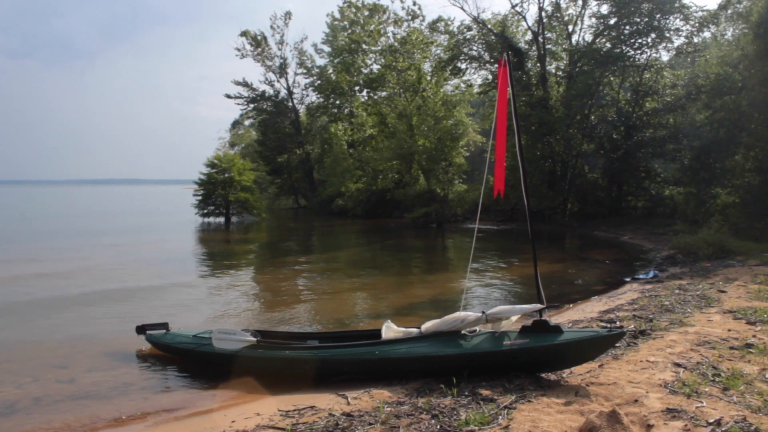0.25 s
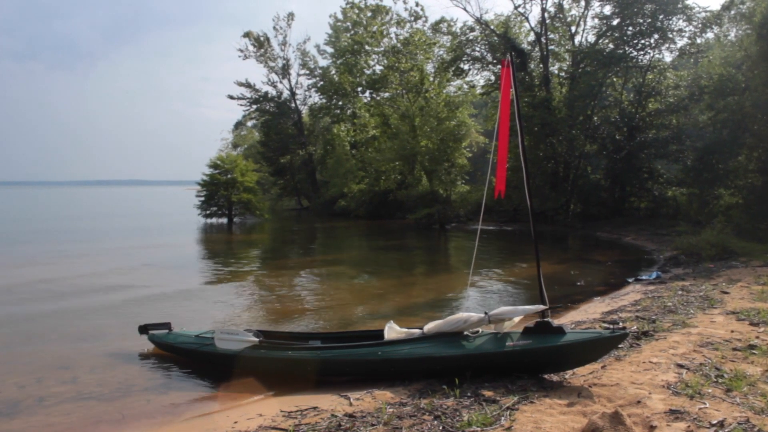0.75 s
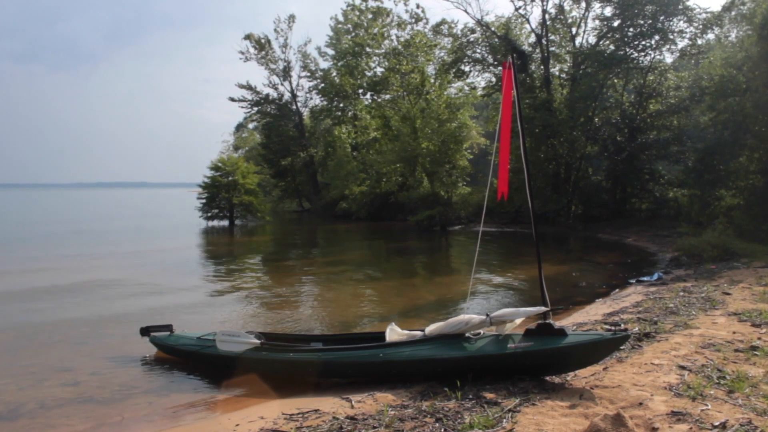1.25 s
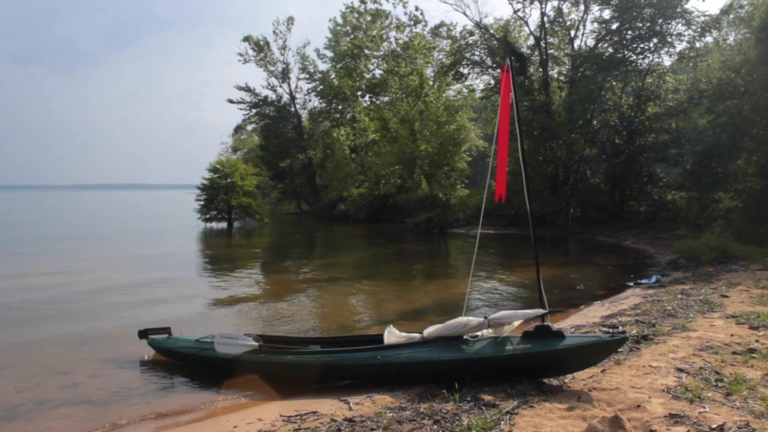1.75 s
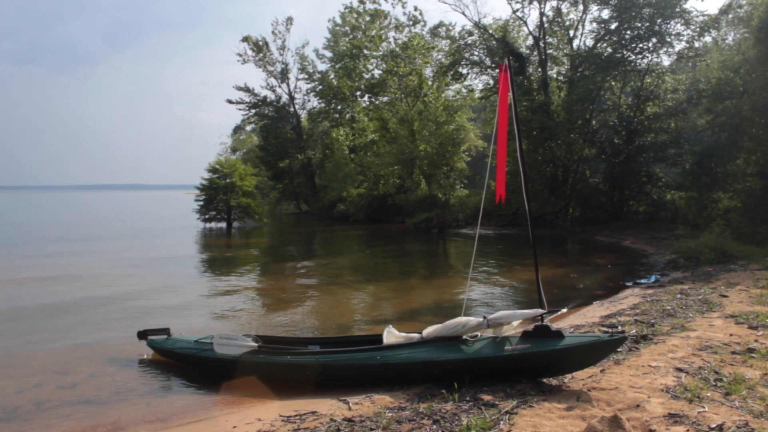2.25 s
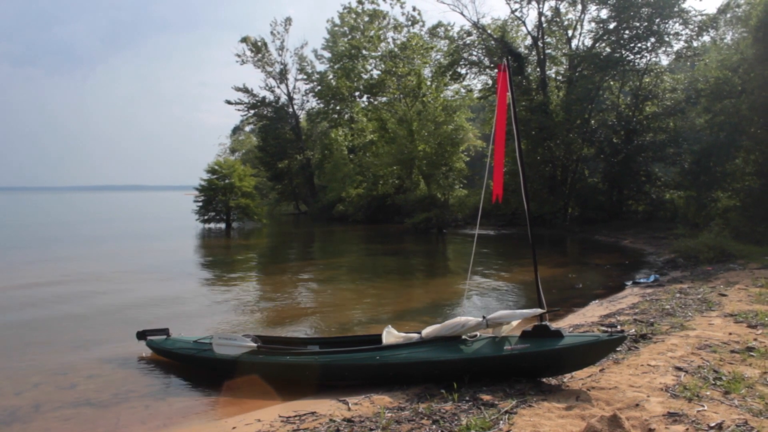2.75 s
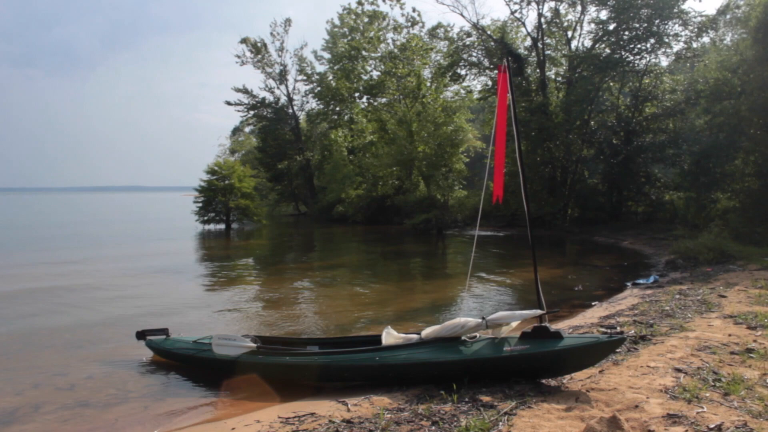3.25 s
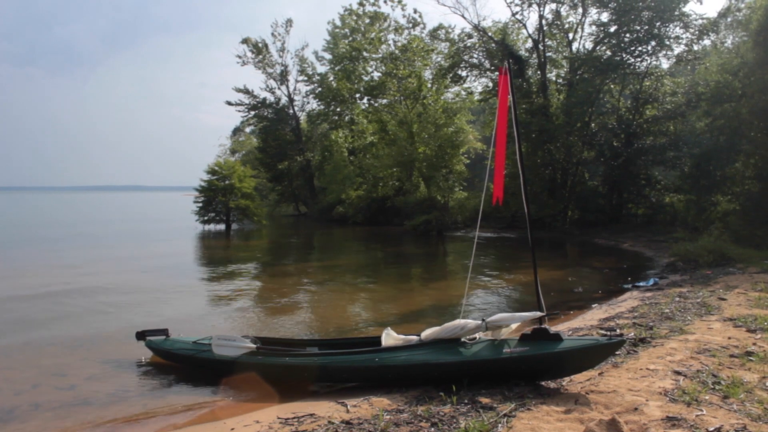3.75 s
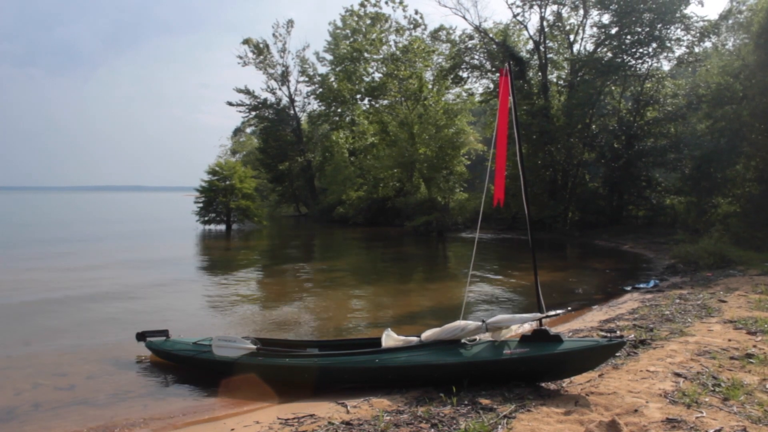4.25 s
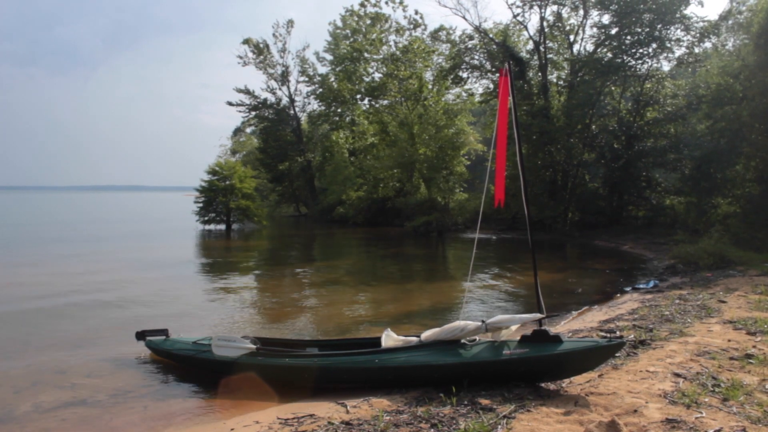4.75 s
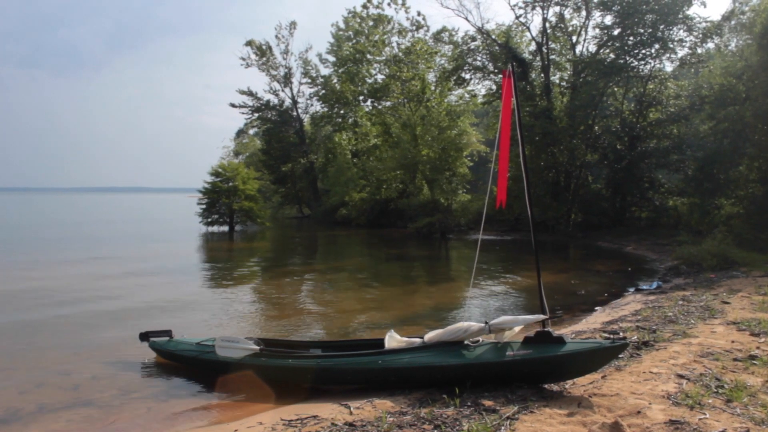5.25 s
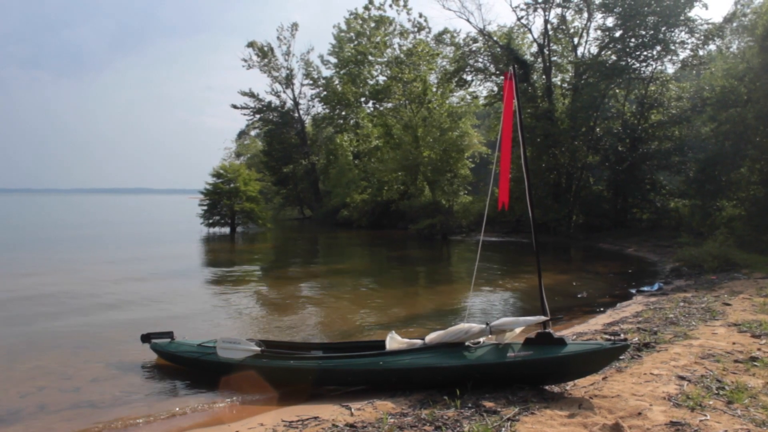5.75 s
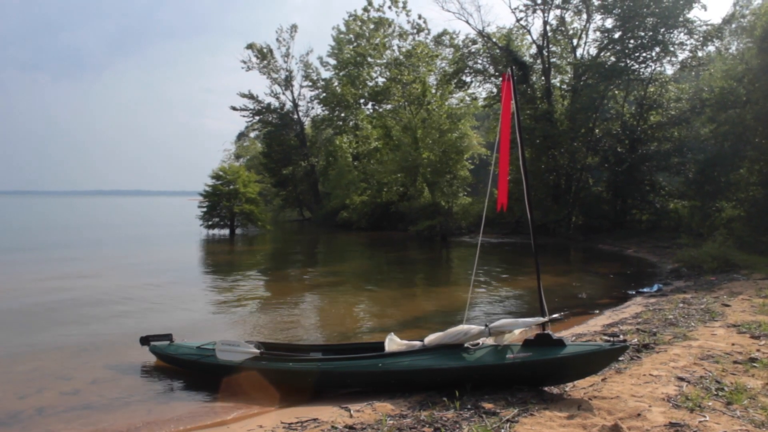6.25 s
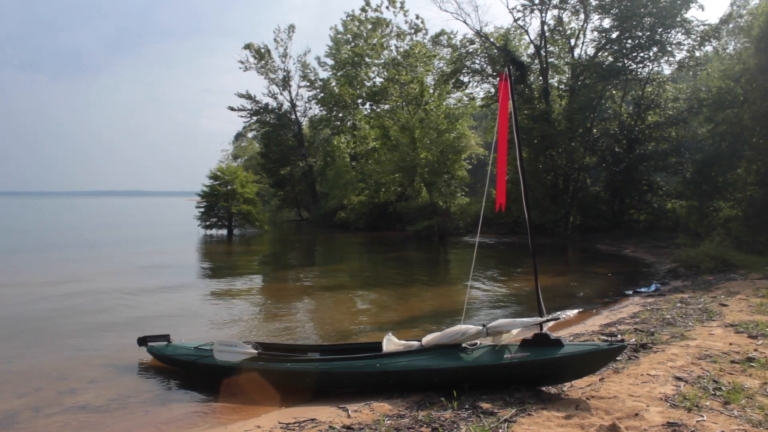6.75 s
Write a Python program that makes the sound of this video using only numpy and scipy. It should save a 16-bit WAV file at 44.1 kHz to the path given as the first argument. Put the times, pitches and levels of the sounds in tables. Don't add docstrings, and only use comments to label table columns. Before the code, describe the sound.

Small waves lap a sandy lake shore with plopping, fizzing bubbles while a bird whistles short slurred notes that echo softly from the trees.

```python
import sys
import numpy as np
from scipy import signal
from scipy.fft import next_fast_len
from scipy.io import wavfile
from scipy.ndimage import uniform_filter1d

SR = 44100
rng = np.random.default_rng(int(sys.argv[2]) if len(sys.argv) > 2 else 0)


def generate_wav(signal):
    frames = np.transpose(np.atleast_2d(signal))
    scaled = np.clip(frames, -1, 1) * 32767
    pcm = np.round(scaled).astype(np.int16)
    wavfile.write(sys.argv[1], SR, pcm)


def boost_factor(decibels):
    exponent = np.asarray(decibels, float) / 20
    return 10 ** exponent


N = 308700

# (time [s], froth level [dB], spray level [dB])
WAVELETS = [(0.0, -47, -58), (0.21, -54.5, -60.5), (0.54, -46, -54), (0.64, -48.5, -58), (0.78, -55, -60.5),
            (1.07, -54.5, -65), (1.44, -58.5, -66), (1.73, -57.5, -58), (1.89, -53, -55.5),
            (2.3, -51.5, -58.5), (2.46, -55.5, -64.5), (3.22, -54.5, -65), (3.55, -61, -74),
            (3.84, -64, -61.5), (4.05, -49.5, -58.5), (4.29, -43.5, -50.5), (4.42, -42, -51.5),
            (4.52, -45.5, -57), (4.64, -50, -56.5), (4.74, -50, -59), (4.87, -57, -62.5), (5.57, -62, -62),
            (5.81, -47, -57), (5.96, -45, -49), (6.04, -42.5, -49.5), (6.22, -45.5, -55.5),
            (6.49, -45, -54.5), (6.75, -49.5, -57), (7.0, -52.5, -60.5)]
# (time [s], level [dB])
MIST_LEVEL = [
    (0, -68),
    (4.2, -73),
    (4.42, -59),
    (4.7, -75.5),
    (6.1, -70),
    (6.45, -61),
    (6.8, -68),
    (7, -70),
]
# (frequency [Hz], level [dB])
FROTH_COLOUR = [(300, -12), (500, -3.5), (1000, -3.5), (2000, -3), (3200, -12), (5000, -44)]
# (frequency [Hz], level [dB])
CHIRP_COLOUR = [(400, -6), (650, -6), (1000, 1.5), (1500, -7)]
# (frequency [Hz], level [dB])
SPRAY_COLOUR = [(2500, -14), (3800, -2), (5500, -5.5), (8000, -14), (11000, -26), (15000, -17.5)]
# (frequency [Hz], level [dB])
CRACKLE_COLOUR = [(1200, -6.5), (2500, 2), (4500, -6.5), (8000, -16)]
# (frequency [Hz], level [dB])
MIST_COLOUR = [(7000, -9), (10000, -12), (13500, 1), (15700, -3)]

# (time [s], peak level [dB], pitch [Hz], 60 dB decay [s])
PLOPS = [(0.267, -44, 616, 0.083), (0.456, -41, 370, 0.084), (0.795, -38.5, 391, 0.1),
         (1.165, -44, 420, 0.11), (1.746, -37, 627, 0.079), (1.889, -40, 662, 0.066),
         (2.125, -39, 627, 0.06), (2.252, -39, 562, 0.079), (2.375, -44, 332, 0.11),
         (4.027, -37, 543, 0.075), (4.135, -37, 656, 0.06), (4.395, -41, 513, 0.078),
         (4.429, -38.5, 514, 0.1), (4.458, -26.5, 278, 0.13), (4.513, -31, 473, 0.081),
         (4.615, -31.5, 283, 0.11), (5.943, -40.5, 533, 0.12), (5.998, -36, 428, 0.15),
         (6.238, -38.5, 773, 0.065), (6.381, -39, 430, 0.13), (6.429, -36.5, 550, 0.072),
         (6.533, -36, 424, 0.11), (6.562, -32, 540, 0.054), (6.583, -31.5, 420, 0.11),
         (6.892, -34, 386, 0.12)]
# (time [s], peak level [dB], pitch [Hz])
BLIPS = [(0.291, -41, 1460), (0.443, -44, 1830), (0.555, -35, 1710), (0.716, -51, 802),
         (0.716, -37.5, 1270), (0.862, -42, 1330), (0.898, -54, 1080), (1.691, -55, 1030),
         (1.863, -40, 1860), (1.878, -32, 1770), (2.288, -41, 1730), (2.344, -33, 1860),
         (2.854, -41.5, 850), (4.201, -46, 1310), (4.273, -34, 980), (4.33, -33, 1450), (4.409, -34, 1110),
         (4.435, -31, 1720), (4.457, -37, 1780), (4.506, -35, 1280), (4.602, -34.5, 1140),
         (4.736, -32, 1254), (5.664, -45, 1140), (5.789, -43, 1000), (5.95, -49, 1400), (5.964, -35, 1780),
         (6.115, -30, 1545), (6.462, -39, 1610), (6.906, -36, 1660), (6.93, -33.5, 1150)]
# (time [s], peak level [dB], pitch [Hz])
SNAPS = [(0.0268, -33, 2760), (0.248, -37, 2510), (0.434, -37, 2780), (0.4414, -36, 2080),
         (0.4615, -32, 3120), (0.5676, -29.5, 2400), (0.6345, -34, 2660), (0.7165, -36, 2170),
         (0.8909, -25.5, 2400), (1.794, -39, 2250), (1.8865, -43, 2580), (2.3421, -35, 2200),
         (3.8811, -40, 2230), (4.137, -30, 3130), (4.3301, -33.5, 2400), (6.129, -30.5, 2400),
         (6.755, -31, 2650), (6.8187, -34.5, 2330), (6.839, -40, 2280), (6.8817, -33, 2600),
         (6.9721, -39, 2220)]
# (time [s], peak level [dB], pitch [Hz])
TICKS = [(0.0238, -37.5, 3730), (0.2084, -46, 3860), (0.2418, -36, 3860), (0.4055, -44, 3970),
         (0.4229, -37.5, 3960), (0.6863, -37.5, 4390), (0.7203, -44, 4600), (1.4925, -47, 3630),
         (1.7135, -36.5, 4050), (1.7444, -37, 3920), (1.7968, -34.5, 3630), (1.8354, -39, 4160),
         (2.0108, -44, 3520), (2.0403, -36, 4020), (2.2857, -48, 4590), (3.9898, -46, 4100),
         (4.0033, -37, 5530), (4.039, -42, 6800), (4.1055, -41, 4210), (4.1051, -38, 6630),
         (4.1365, -39, 3640), (4.1969, -42, 3870), (4.2931, -43, 4620), (4.3061, -39, 4020),
         (4.4852, -44, 4930), (5.6062, -36, 6700), (5.7154, -38, 3320), (5.7773, -40, 3640),
         (5.8067, -41, 3790), (5.8227, -38, 4200), (5.8541, -34.5, 5360), (5.8726, -26, 4500),
         (5.897, -30, 3900), (5.9738, -33, 4570), (6.0053, -36, 3950), (6.017, -34, 4300),
         (6.062, -36, 3640), (6.0741, -29.5, 4820), (6.1624, -35, 3860), (6.2033, -40, 4030)]
# (time [s], peak level [dB], pitch [Hz])
HIGH_TICKS = [(0.209, -41, 7300), (1.4925, -44, 6620), (3.853, -48.5, 9350), (5.9204, -46, 6120),
              (6.0043, -37, 5440), (6.2502, -44, 5830), (6.4906, -41, 6350)]
# (time [s], length [s], start pitch [Hz], end pitch [Hz], peak level [dB])
RISERS = [(0.852, 0.034, 1037, 1950, -49), (0.89, 0.022, 870, 1650, -38.5), (1.755, 0.031, 623, 750, -45),
          (1.808, 0.026, 774, 1120, -44.5), (1.885, 0.024, 1020, 1400, -39), (1.702, 0.029, 960, 1110, -45),
          (2.453, 0.025, 783, 2100, -43), (2.471, 0.023, 770, 1580, -49), (4.277, .04, 665, 770, -41),
          (4.283, 0.021, 1020, 1510, -42), (4.47, 0.057, 651, 1410, -44.5), (4.472, .012, 1880, 3000, -49),
          (4.579, 0.024, 603, 1206, -43), (4.559, 0.038, 679, 2580, -42.5), (4.653, .035, 865, 1900, -61),
          (4.701, 0.031, 590, 1400, -43), (5.711, 0.08, 538, 610, -42.5), (6.114, 0.02, 1190, 1430, -36.5),
          (6.413, .016, 900, 1300, -44), (6.929, 0.0057, 1630, 1750, -28.5),
          (.357, 0.011, 1400, 1550, -41.5), (4.324, 0.0123, 1485, 2700, -40)]
# (time [s], peak level [dB])
BURSTS = [(0.7417, -39), (1.5833, -34), (1.7464, -30.5), (2.2857, -34), (2.3376, -43), (2.3506, -24),
          (3.8526, -44), (4.1046, -30), (4.4353, -44), (4.4528, -31), (4.6014, -26), (4.6174, -26),
          (4.7192, -35)]

# (time [s], pitch [Hz], level [dB])
LOW_NOTES = [
    [(0.6, 2723, -69), (0.632, 2620, -39.5), (0.72, 2384, -55)],
    [(1.005, 2664, -42), (1.063, 2620, -42.5), (1.09, 2610, -52)],
    [(1.78, 2163, -51), (1.816, 2400, -52), (1.84, 2248, -48)],
    [(3.865, 2436, -53), (3.901, 2177, -41.5), (3.935, 2171, -54)],
    [(3.96, 2420, -53), (4.002, 2653, -38), (4.05, 2690, -54)],
    [(5.41, 2709, -45.5), (5.512, 2455, -46), (5.55, 2556, -49)],
    [(5.845, 2640, -35), (5.883, 2657, -42.5), (5.91, 2570, -54)],
    [(6.87, 2490, -52), (6.894, 2710, -46), (6.93, 2680, -53)],
]
# (time [s], pitch [Hz], level [dB])
HIGH_NOTES = [
    [(.775, 3340, -50), (.797, 3100, -35.5), (.813, 2936, -31), (.83, 2890, -35), (.85, 2930, -48)],
    [(.94, 2704, -54), (.965, 2820, -41), (.98, 2930, -31), (.996, 3055, -33), (1.004, 2660, -32)],
    [(2.965, 3110, -56), (2.98, 2880, -49), (2.997, 2600, -51)],
    [(3.015, 3286, -51), (3.035, 3096, -42), (3.055, 3044, -34), (3.075, 3070, -43), (3.1, 3100, -57)],
    [(3.17, 3030, -66), (3.205, 2995, -47), (3.23, 2910, -33), (3.255, 2790, -48), (3.278, 2604, -41),
     (3.3, 2580, -50)],
    [(4.578, 3350, -52), (4.61, 3126, -42.5), (4.645, 2876, -35), (4.665, 2750, -42), (4.68, 2330, -43)],
    [(4.705, 2570, -49), (4.725, 2800, -46), (4.739, 2935, -29), (4.753, 2936, -34.5), (4.77, 2930, -52)],
    [(5.592, 3330, -55), (5.606, 3200, -39), (5.626, 2930, -34), (5.645, 2894, -31.5), (5.67, 2960, -57)],
    [(5.765, 2770, -54), (5.79, 2800, -42), (5.808, 2920, -31), (5.83, 3050, -35), (5.845, 2780, -30)],
    [(6.47, 2930, -58), (6.486, 2960, -48), (6.505, 2850, -54)],
]
# (time [s], pitch [Hz], level [dB])
SLURS = [
    [(1.878, 2000, -44), (1.893, 2550, -40), (1.91, 2700, -43), (1.94, 2770, -53)],
    [(2.02, 2850, -50), (2.04, 2930, -35.5), (2.057, 3200, -42.5), (2.08, 2750, -39), (2.105, 2400, -47),
     (2.128, 2150, -39)],
    [(2.195, 1850, -54), (2.22, 2250, -51), (2.24, 2400, -60), (2.25, 2700, -43), (2.275, 2950, -54),
     (2.305, 2840, -42), (2.33, 2830, -53)],
]
# (time [s], pitch [Hz], level [dB])
THIN_CALLS = [
    [(.995, 3300, -49), (1.015, 3850, -53), (1.035, 3970, -60)],
    [(2.468, 5270, -58), (2.48, 4600, -56), (2.495, 4100, -60)],
    [(5.55, 4530, -60), (5.575, 3920, -58), (5.595, 3450, -58)],
    [(5.33, 4300, -60), (5.39, 3000, -64)],
    [(6.63, 4900, -66), (6.655, 5600, -61), (6.68, 6450, -60)],
    [(6.812, 3970, -49), (6.828, 4480, -52), (6.86, 4650, -60), (6.878, 5000, -56), (6.905, 5700, -53),
     (6.935, 7000, -62), (6.995, 6900, -58)],
]
# (time [s], level [dB])
CHORUS_LEVEL = [(0, -52), (.25, -57.5), (.45, -50.5), (.7, -59), (1.35, -59.5), (1.5, -53.5), (1.68, -56),
                (2.0, -56), (2.4, -59.5), (2.9, -60), (3.6, -67), (4.7, -64), (5.0, -55), (5.3, -73),
                (6.4, -62), (6.6, -48.5), (6.8, -59), (7, -76)]
# (time [s], level [dB])
DRONE_LEVEL = [
    (0.0, -48),
    (0.68, -50.5),
    (4.21, -59),
    (4.48, -55),
    (4.5, -61.5),
    (5.09, -61),
    (5.69, -50),
    (6.82, -48),
    (7.0, -57),
]
# (frequency [Hz], density [dB per Hz])
AIR_COLOUR = [(12, -39), (20, -12), (27, -7), (149, -5), (307, -10.5), (394, -10), (429, -12.5), (688, -12),
              (791, -15.5), (1310, -13.5), (1460, -13.5), (2620, -22.5), (4330, -19.5), (6220, -25.5),
              (15600, -28)]


def evened(x):
    return x / np.sqrt(np.mean(x ** 2) + 1e-20)


def curve(rows, column):
    rows = np.array(rows)
    return np.interp(np.arange(N) / SR, rows[:, 0], rows[:, column])


def read(colour, hz):
    f, value = np.transpose(colour)
    return np.interp(np.log(hz + 1), np.log(f + 1), value)


def add(mix, s, sound):
    part = mix[round(s * SR):][:len(sound)]
    part += sound[:len(part)]


def hiss(colour, patchy_db):
    hz = np.fft.rfftfreq(1024, 1 / SR)
    a, b, patches = rng.standard_normal((N // 256 + 5, 513, 3)).T
    patches = uniform_filter1d(patches, size=10, axis=0)
    patches = evened(uniform_filter1d(patches, size=12, axis=1))
    level_db = read(colour, hz)[:, None] + patchy_db * patches
    z = (a + 1j * b) * boost_factor(level_db)
    return evened(signal.istft(z, nperseg=1024, noverlap=768)[1][:N])


def flutter(hz):
    z = rng.standard_normal(N) + 1j * rng.standard_normal(N)
    r = np.exp(-2 * np.pi * hz / SR)
    z = signal.lfilter([1], [1, -2 * r, r * r], z)
    return z / np.sqrt(np.mean(abs(z) ** 2))


def bubble(hz, t60, climb, swell=0.34):
    t = np.arange(round(t60 * SR) + 8) / SR
    turns = hz * (t + climb * t ** 2 / (2 * t60))
    rise = np.sin(np.pi / 2 * np.minimum(t * hz / swell, 1)) ** 2
    return np.sin(2 * np.pi * turns) * boost_factor(-60 * t / t60) * rise


def swarm(colour, per_s, cycles, spread_db, climb, swell, count=26):
    loudness = boost_factor(spread_db * np.minimum(rng.exponential(1, N), 3.0))
    hits = loudness * (rng.random(N) < per_s / SR)
    kind, out = rng.integers(0, count, N), np.zeros(N)
    ring, lift = rng.uniform(0.615, 2.15, (2, count))
    for k, hz in enumerate(np.geomspace(colour[0][0], colour[-1][0], count)):
        grain = bubble(hz, cycles * ring[k] / hz, climb * lift[k], swell * ring[k])
        grain = grain / np.linalg.norm(grain) * np.sqrt(hz) * boost_factor(read(colour, hz))
        out += signal.oaconvolve(hits * (kind == k), grain)[:N]
    return evened(out)


def wavelets():
    clumps = boost_factor(2.48 * flutter(28.4).real)
    froth = swarm(FROTH_COLOUR, 1700, 29, 3.0, 0.371, 1.87)
    froth += 0.45 * swarm(CHIRP_COLOUR, 110, 59.6, 3.9, 1.1, 6.0, count=12)
    froth += 0.49 * hiss(FROTH_COLOUR, 2.5)
    spray = swarm(SPRAY_COLOUR, 1300, 26, 4.1, 0.12, 5.2, count=18)
    spray += 0.85 * hiss(SPRAY_COLOUR, 1.5)
    spray += 0.9 * swarm(CRACKLE_COLOUR, 120, 4.4, 5.5, 0.1, 1.0, count=7)
    mist = 0.67 * swarm(MIST_COLOUR, 900, 18, 5.0, 0.05, 6.0, count=5) + hiss(MIST_COLOUR, 1.8)
    foam = boost_factor(curve(WAVELETS, 1) + 0.4) * froth + boost_factor(curve(WAVELETS, 2) - 2.13) * spray
    return clumps * foam + boost_factor(curve(MIST_LEVEL, 1)) * mist


def ringing_bubbles():
    out = np.zeros(N)
    for s, db, hz, t60 in PLOPS:
        add(out, s, boost_factor(db) * bubble(hz, np.clip(t60, 0.01, 0.4), 0.12))
    # bubbles, ring [cycles], lift [dB], swell [cycles]
    kinds = ((BLIPS, 30, 6, 1.2), (SNAPS, 28, 8, 2.5), (TICKS, 28, 12, 5.0), (HIGH_TICKS, 36, 12, 7.0))
    for rows, cycles, lift_db, swell in kinds:
        for s, db, hz in rows:
            add(out, s, boost_factor(db + lift_db) * bubble(hz, cycles / hz, 0.036, swell))
    return out


def rising_bubbles():
    out = np.zeros(N)
    for s, length, from_hz, to_hz, db in RISERS:
        u = np.linspace(0, 1, round(length * SR))
        pitch = from_hz * (to_hz / from_hz) ** (u ** 1.276)
        tone = np.sin(2 * np.pi * np.cumsum(pitch) / SR)
        add(out, s, boost_factor(db) * tone * signal.windows.tukey(len(u), 0.4))
    return out


def bursting_films():
    out = np.zeros(N)
    puffs = np.diff(rng.standard_normal((len(BURSTS), 401)), axis=1)
    for (s, db), puff in zip(BURSTS, puffs):
        length = round(np.clip(11 * (db + 54.5), 40, 400))
        shape = np.hanning(length) * np.linspace(0.4, 1, length)
        add(out, s, boost_factor(db - 15.5) * puff[:length] * shape)
    return out


def birds(notes):
    out = np.zeros(N)
    for rows in notes:
        s, hz, db = np.transpose(rows)
        t = np.arange(s[0], s[-1], 1 / SR)
        pitch = uniform_filter1d(np.interp(t, s, hz), size=300)
        tone = np.sqrt(2) * np.sin(2 * np.pi * np.cumsum(pitch) / SR)
        add(out, s[0], tone * boost_factor(np.interp(t, s, db)) * signal.windows.tukey(len(t), 0.15))
    return out


def blurred(x, share, hz):
    share = np.clip(share, 0, 1)
    waver = np.sqrt(1 - share) + np.sqrt(share) * flutter(hz)
    return (signal.hilbert(x, next_fast_len(N))[:N] * waver).real


def echoes(x, t60, gap_s):
    taps = np.zeros(SR)
    at = np.arange(0, SR - 20, 20) + rng.integers(0, 20, (SR - 1) // 20)
    taps[at] = rng.choice([-1., 1.], len(at))
    t = np.arange(SR) / SR
    taps *= boost_factor(-60 * t / t60) * np.clip(t / gap_s, 0, 1)
    return signal.fftconvolve(x, taps / np.linalg.norm(taps))[:N]


def chorus():
    band = [(2200, -43), (2600, -3.5), (3000, -5), (3400, -8.5), (3900, -81)]
    return boost_factor(curve(CHORUS_LEVEL, 1)) * hiss(band, 4.8)


def drone():
    band = [(70, -18), (120, -6.5), (170, 7), (225, 1.5), (300, -34), (500, -74)]
    return boost_factor(curve(DRONE_LEVEL, 1)) * hiss(band, 0.8)


def air():
    return boost_factor(-53) * hiss(AIR_COLOUR, 0.84)


def scene():
    drops = ringing_bubbles() + rising_bubbles() + bursting_films()
    water = wavelets() + drops + boost_factor(-10) * echoes(drops, 0.068, 0.0045)
    near = blurred(birds(LOW_NOTES + HIGH_NOTES), 0.16, 102)
    far = blurred(birds(SLURS + THIN_CALLS), 0.5, 140)
    song = near + far
    wood = blurred(echoes(song, 1.35, 0.011), 0.24, 120)
    trunks = echoes(song, 0.18, 0.0052)
    song = song + boost_factor(-11.5) * (wood + trunks)
    return (water + song + chorus() + drone() + air())[None]


def band_limit(x):
    return signal.sosfilt(signal.butter(12, 15740, fs=SR, output="sos"), x)


def record(dry):
    edge_hz, offset = 15760, 0.001
    lowpass = signal.firwin(801, edge_hz, window=("kaiser", 9), fs=SR)
    limited = signal.oaconvolve(dry, lowpass[None], "same")
    return band_limit(limited + offset)


dry = scene()
out = record(dry)
generate_wav(out)
```